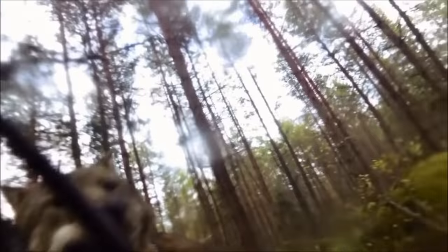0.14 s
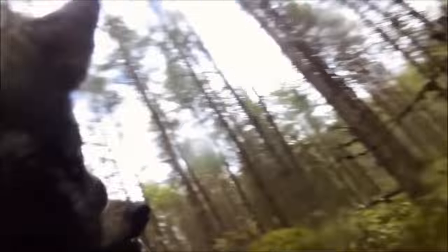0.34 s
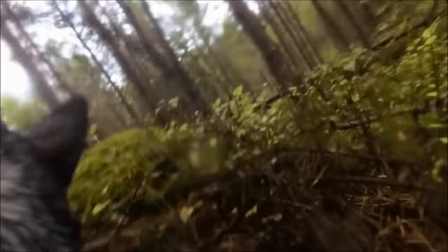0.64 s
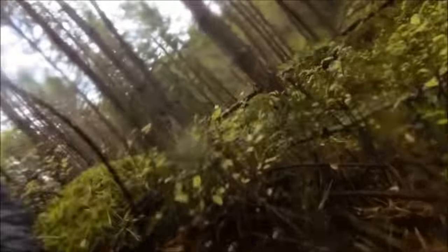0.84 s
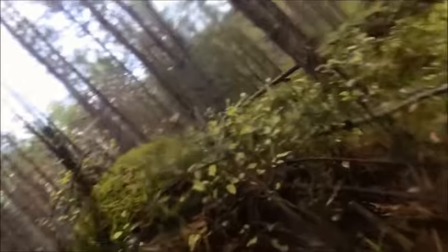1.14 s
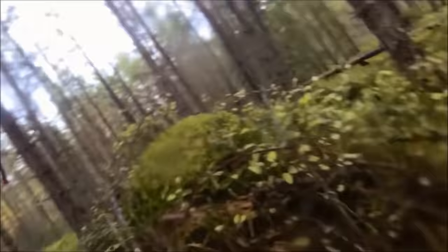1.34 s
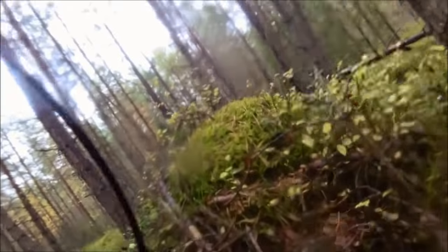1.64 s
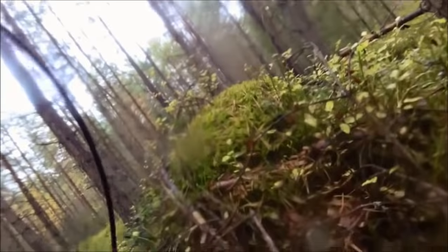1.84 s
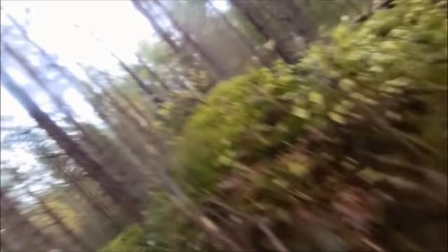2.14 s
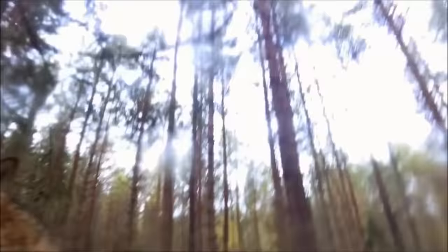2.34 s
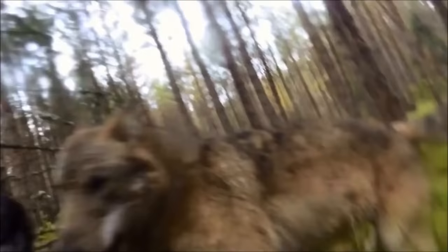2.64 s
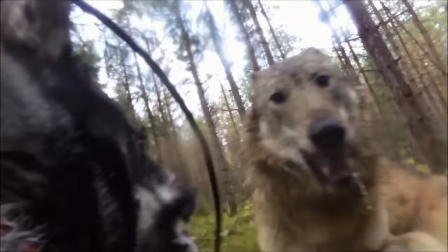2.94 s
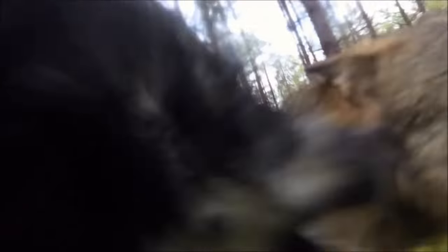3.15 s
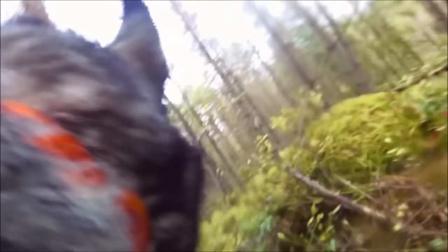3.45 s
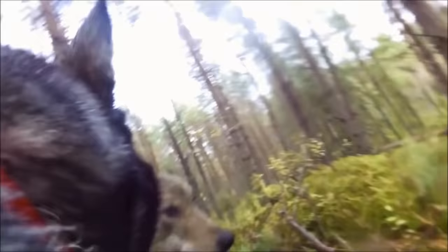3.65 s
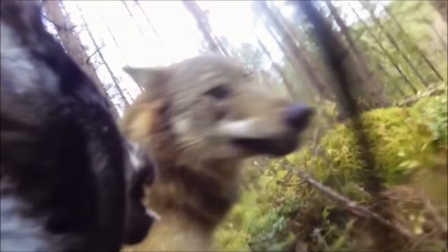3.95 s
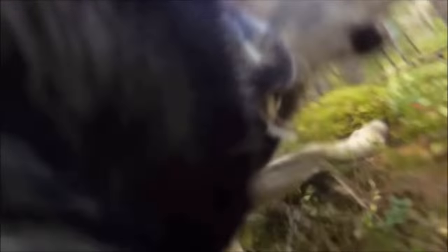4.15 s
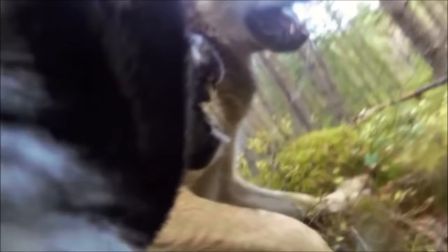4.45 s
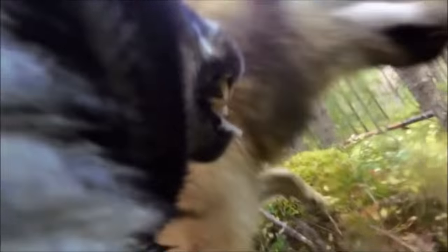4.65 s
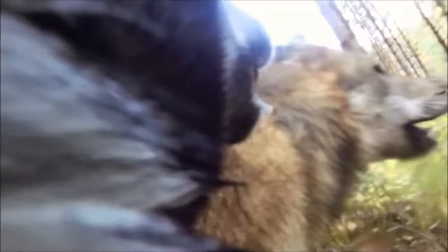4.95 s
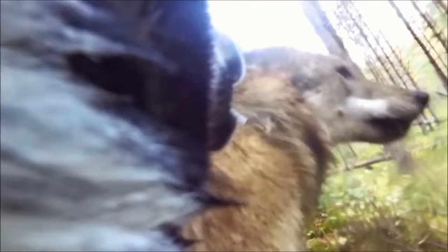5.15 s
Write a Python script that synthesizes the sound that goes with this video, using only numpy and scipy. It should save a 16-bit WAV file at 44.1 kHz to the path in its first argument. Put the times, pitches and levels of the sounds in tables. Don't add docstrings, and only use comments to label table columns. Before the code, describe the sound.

Body-worn microphone inside a plastic case: uneven hard clacks, small ticks, leaf brushes and low thuds as a dog scuffles through forest undergrowth. Knocks come in bursts, densest around 3.3 to 3.5 and 4.2 to 4.6 seconds, some distorting. A wolf's soft, throaty growl emerges near 3 seconds, falls in pitch near 3.8, and returns in the last half second among muffled fur presses. Quiet wood murmur lies behind.

```python
import sys
import numpy as np
from scipy import signal
from scipy.io import wavfile
from scipy.ndimage import uniform_filter1d

SR = 44100
rng = np.random.default_rng(int(sys.argv[2]) if len(sys.argv) > 2 else 0)


def voltage_ratio(level):
    return 10 ** (np.asarray(level, float) / 20)


def wav_record(signal):
    frames = np.transpose(np.atleast_2d(signal))
    bounded = np.clip(frames, -1, 1)
    quanta = np.round(bounded * 32767).astype(np.int16)
    wavfile.write(sys.argv[1], SR, quanta)


N = 233447

# [f/Hz, width/Hz, level/dB]
WALL_MODES = [(1440, 247, 13.5), (860, 1200, -2.5)]
PORT_MODES = [(3353, 1110, 7), (3600, 600, -20)]
LID_MODES = [(2158, 524, 0.0057)]
# [t/s, rise/ms, fall/ms, level/dB]
STRAP_CHATTER = (.6185, 33, 11, -14)

HARD_DB = -15
KNOCK_TREBLE_DB, COAT_TREBLE_DB = -25.5, -44


def ring(x, modes, order=2):
    out = 0
    for k, (hz, width_hz, db) in enumerate(modes):
        y = x
        for _ in range(order):
            y = signal.lfilter(*signal.iirpeak(hz, hz / width_hz, fs=SR), y)
        out = out + (-1) ** k * voltage_ratio(db) * y
    return out


def walk(rate_hz):
    hold = int(SR / rate_hz)
    levels = np.repeat(rng.standard_normal(N // hold + 1), hold)
    return 1.2 * uniform_filter1d(levels, hold)[:N]


def grains(spread_db):
    return rng.standard_normal(N) * voltage_ratio(spread_db * rng.exponential(size=N))


def unit(x):
    return x / np.sqrt(np.mean(x ** 2))


def curve(table):
    s, *columns = np.transpose(table)
    return [np.interp(np.arange(N) / SR, s, c) for c in columns]


def seal(x):
    return signal.sosfilt(signal.butter(6, 4500., fs=SR, output="sos"), x)


def add(out, s, rise_ms, fall_ms, db, source, body=None, order=2):
    start = max(int((s - 0.0028 * rise_ms) * SR), 0)
    stop = min(int((s + .0025 * fall_ms + .01) * SR), N)
    ms = (np.arange(start, stop) / SR - s) * 1000
    swell = voltage_ratio(-9 * np.where(ms <= 0, (ms / rise_ms) ** 2, (ms / fall_ms) ** order))
    y = swell * source[start:stop]
    if body is not None:
        y = ring(y, body)
    out[start:stop] += voltage_ratio(db) * y * np.sqrt(np.sum(swell ** 2) / np.sum(y ** 2))


def contacts():
    # [t/s, fall/ms, level/dB, wall share/dB, lid share/dB]
    knocks = [(0.4169, 4.2, -6.5, -9.5, -13.5), (0.4253, 13, -9, -4.5, -4), (0.5269, 4.9, -8, -10, -12),
              (.533, 6.5, -20, -7, -5), (0.5398, 6.5, -8.5, -12, -10), (0.767, 1.6, -8.5, -21, -28),
              (0.792, 2.7, -13.5, -3.5, -25), (2.9009, 7.2, -8, -8.5, -9), (3.254, 35, -24.5, -20, -25),
              (3.255, 6, -6.5, -6.5, -7), (3.267, 7.3, -8, -2, -25), (3.3596, 27.2, -7.5, -3.5, -10),
              (3.4174, 5, -8.5, -5.5, -13.5), (3.4932, 4.7, -9, -3.5, -1), (3.4985, 26, -14.5, -10.5, -9.5),
              (3.5016, 4.5, -6.5, -1, -16.5), (3.9713, 6.6, -7, -6, -4), (4.2227, 20, -21, -4.5, -2),
              (4.227, 4.3, -7, -5.5, -14.5), (4.2389, 3.2, -6, -.4, -18.5), (4.2808, 4.5, -7, -5.5, -7),
              (4.2932, 8.6, -9, -3.5, -5), (4.3145, 2.8, -14, -15, -21), (4.317, 26, -12, -4, -14),
              (4.3475, 3.4, -11, -4.5, -19), (4.3725, 3.9, -18.5, -5.5, -7.5), (4.3762, 1.7, -15, -10, -9),
              (4.473, 9.9, -9, -10, -20.5), (4.4917, 3.9, -13, -6, -11), (4.5458, 3, -7, -7, -9),
              (4.564, 3.4, -10, -10, -14), (4.5726, 2, -7.5, -3.5, -5.5)]
    # [t/s, level/dB, wall share/dB]
    ticks = [(0.1047, -23.5, -8), (0.51, -27, -9), (0.651, -36, -18), (0.6616, -30, -11), (0.762, -16, -26),
             (0.8463, -15.5, -11.5), (0.89, -36, -9), (0.9872, -18, -29), (1.2045, -12.5, -5.5),
             (1.2155, -19, -2), (1.476, -18.5, -11.5), (1.5643, -20, -4.5), (1.6206, -25, -10),
             (1.629, -17.5, -5), (1.7728, -27, -3), (2.352, -16, -6), (2.4729, -20, -6), (2.5401, -19, -36),
             (2.5834, -32, -9.3), (4.803, -31, -1), (2.705, -17, -7), (3.291, -19, -4),
             (3.5225, -11.5, -28), (3.5347, -11, -25), (3.545, -13, -4), (3.5704, -13.5, -37),
             (3.7175, -24.5, -22), (4.1411, -27.5, -4), (4.3045, -21.5, -1.5), (5.213, -25, -25),
             (0.4439, -16, -4), (1.559, -25.5, -3), (1.682, -32, -2), (1.716, -38.5, -20), (.402, -26, -25),
             (0.697, -30, -30), (.855, -17.5, -14), (2.617, -35, 0), (2.646, -22.5, -10), (2.657, -32, -14),
             (2.661, -35, -12), (2.674, -40, -7), (2.7, -24, -19), (2.714, -31, -3), (2.74, -19, -18),
             (2.745, -18.5, -12), (2.75, -17, -11), (2.791, -32, -16), (2.879, -33, -20), (2.884, -36, -14),
             (2.895, -37, -25), (4.984, -29, -11), (4.422, -56, -4), (3.4492, -10.5, -8), (.168, -42.5, -9),
             (.331, -39, -5), (0.347, -40, 1.5), (2.486, -23.5, -15), (3.323, -35, -16), (3.655, -42, -15)]
    # [t/s, fall/ms, level/dB]
    swipes = [
        (.762, 56, -29.5),
        (1.716, 6, -45),
        (1.8001, 39, -44.5),
        (1.8593, 17, -28.5),
        (2.238, 13, -34),
        (2.396, 18, -16),
        (3.308, 16, -33),
        (3.77, 100, -49.5),
        (3.9907, 89, -53),
        (4.259, 54, -38.5),
    ]
    # [t/s, rise/ms, level/dB]
    pulls = [(0.039, 40, -42.5), (0.3676, 20, -36), (0.462, 63, -30.5), (0.856, 46, -31.5),
             (.9309, 37, -47), (1.6687, 5.8, -21.5), (2.4642, 18, -14), (2.7499, 13, -32),
             (2.8034, 40, -43.5), (3.4057, 41, -21), (3.44, 16, -18.5), (3.4707, 61, -32.5),
             (3.875, 25, -38), (4.1551, 18, -41), (4.197, 24, -41.5)]
    # [t/s, rise and fall/ms, level/dB]
    rubs = [(0.114, 16, -42.5), (0.704, 40, -29.5), (0.987, 18, -43), (1.2036, 51, -48), (1.482, 27, -41.5),
            (1.6025, 84, -45.5), (2.328, 31, -28), (2.423, 49, -25.5), (2.545, 13, -37), (2.7036, 18, -34),
            (2.889, 38, -52), (3.58, 46, -37.5), (4.338, 16, -16), (.49, 30, -45.5), (2.63, 30, -44.5),
            (2.84, 17, -43), (.262, 17, -50), (.69, 6.1, -28), (1.455, 11, -41)]
    # [t/s, peak/dB, treble/dB]
    crackles = [(1.4458, -24, -63), (1.499, -20, -49), (1.514, -26, -46), (1.5775, -30, -40),
                (1.6604, -7.5, -52), (1.708, -36, -40), (1.758, -37, -60), (1.8006, -20, -52),
                (1.8156, -22, -60), (2.027, -46.5, -48), (2.238, -14, -48), (3.346, -25, -55),
                (3.6168, -25, -66), (3.64, -36, -62), (3.94, -46, -68), (4.064, -38, -73),
                (4.3947, -34, -69), (4.436, -32, -64)]
    # [t/s, rise/ms, fall/ms, level/dB]
    presses = [(4.502, 1.9, 21.5, -25.5), (4.5865, 33, 33, -31.5), (4.68, 15, 18, -24.5),
               (4.712, 22, 17.5, -14), (4.738, 14, 12.2, -18.5), (4.8126, 13, 30, -29),
               (4.895, 20, 8.4, -50), (4.9358, 18, 12, -26), (4.975, 25, 4.4, -28.5),
               (4.9973, 1.2, 42.5, -26.5), (5.055, 15, 6.8, -34.5), (5.11, 40, 40, -50.5),
               (5.1936, 22, 10, -28), (5.2706, 13, 16, -40.5)]
    blow_ms = 1.3
    scrape = (-9.5, -30)
    touches = [(s, blow_ms, fall, db, wall, KNOCK_TREBLE_DB, lid) for s, fall, db, wall, lid in knocks]
    touches += [(s, blow_ms, 2.08, db, wall, -31) for s, db, wall in ticks]
    touches += [(s, blow_ms, fall, db, *scrape) for s, fall, db in swipes]
    touches += [(s, rise, 0.26 * rise, db, *scrape) for s, rise, db in pulls]
    touches += [(s, ms, ms, db, *scrape) for s, ms, db in rubs]
    touches += [(s, blow_ms, 1.67, db - 3.5, -4, top - db + 3.5 - 9.5) for s, db, top in crackles]
    touches += [(*press, -8, COAT_TREBLE_DB) for press in presses]
    touches += [(*STRAP_CHATTER, *scrape)]
    return touches


def case():
    # [f/Hz, width/Hz, level/dB]
    treble_modes = [(5120, 1900, 13), (8410, 3000, -17), (13000, 9000, -0.5)]
    low, high = np.zeros(N), np.zeros(N)
    t = np.arange(N) / SR
    jerks = unit(grains(spread_db=2.0) * voltage_ratio(4.07 * walk(300)))
    rattle = unit(grains(spread_db=0.5) * voltage_ratio(0.51 * walk(300)))
    for s, rise, fall, db, wall_db, treble_db, *own_lid in contacts():
        lid_db = own_lid[0] if own_lid else -8.5
        hard = db > HARD_DB
        dull = treble_db == COAT_TREBLE_DB
        knock = treble_db == KNOCK_TREBLE_DB
        push = np.roll(rattle if hard or dull else jerks, int(s * 9973))
        if s == STRAP_CHATTER[0]:
            push *= voltage_ratio(4 * np.cos(2 * np.pi * 165 * (t - .6035)))
        order = 4 if knock else 2
        if rise < 2.4:
            s, rise = s - .0007, .3 * rise
            push[int(s * SR)] = 5.9
        port_db = 10 * np.log10(max(1 - voltage_ratio(2 * wall_db) - voltage_ratio(2 * lid_db), .1))
        low_db = db + .45 * max(db + 12, 0)
        wall = WALL_MODES[:1] if dull else WALL_MODES
        add(low, s, rise, fall, low_db + wall_db - .4, push, wall, order)
        add(low, s, rise, fall, low_db + port_db + 0.56, push, PORT_MODES, order)
        add(low, s, rise, fall, low_db + lid_db, push, LID_MODES, order)
        add(high, s, rise, 1.1 * fall, db + treble_db + 3.5, push, treble_modes[:2], order)
        if hard and knock:
            add(high, s, rise, min(fall, 5), db + treble_db - 1, push, treble_modes[2:])
    return seal(low) + high


def mount():
    # [t/s, fall/ms, level/dB, centre f/Hz]
    jolts = [(0.5295, 23, -19.5, 215), (0.6896, 14, -17.5, 385), (.8583, 10.6, -21.5, 148),
             (1.2034, 8.9, -19, 395), (1.7323, 100, -39.5, 238), (1.806, 19.6, -24, 195),
             (2.2387, 58, -28.5, 230), (2.4245, 2, -0.5, 183), (2.5068, 21, -29, 270),
             (2.5412, 4, -11.5, 424), (2.907, 4.9, -14.5, 265), (3.2564, 9.9, -14, 220),
             (3.794, 42, -32.5, 262), (3.974, 11.3, -17, 333), (3.9844, 11.7, -24, 183),
             (4.154, 6.5, -29.5, 530), (4.2329, 14.2, -19.5, 355), (4.283, 6.7, -14.5, 490),
             (4.342, 6.1, -25.5, 580), (4.3725, 2.7, -18, 473), (4.3944, 45, -39.5, 230),
             (4.474, 8.9, -20, 422), (4.5459, 6.3, -18, 300), (4.5727, 4.5, -15.5, 446),
             (2.267, 3.4, -29.5, 395), (2.787, 13, -37, 580), (4.813, 25, -33.5, 700),
             (4.979, 8.2, -25.5, 600), (.794, 4, -25.5, 410), (2.317, 7.7, -20, 600), (2.394, 8, -18, 650),
             (2.462, 8.2, -20.5, 695), (1.629, 8, -25.5, 510), (1.76, 5, -25.5, 400),
             (1.499, 4, -18.5, 221)]
    # [t/s, rise/ms, fall/ms, level/dB, centre f/Hz]
    heaves = [(.0254, 160, 9.8, -38.5, 205), (0.101, 9, 28, -35, 250), (0.428, 7.8, 15.5, -15, 164.5),
              (0.4339, 57, 11, -25.5, 167), (.79, 57, 32, -22.5, 244), (0.9934, 16.3, 2.8, -24.5, 179.5),
              (1.1988, 59, 58, -37.5, 181), (1.332, 41, 17, -46.5, 176), (1.491, 41.7, 17, -21, 195),
              (1.6161, 11, 35, -28, 232), (1.667, 9.4, 9.1, -10, 183), (1.862, 7, 12.7, -16, 252),
              (1.9103, 32, 16, -37.5, 233), (2.1477, 37, 30, -40, 222), (2.3229, 11, 2.8, -12.5, 148),
              (2.4204, 35, 51, -19, 244), (2.724, 42, 35, -25.5, 152), (3.3991, 50, 49, -20, 246),
              (3.4946, 7.1, 48, -23.5, 283), (4.5827, 12, 22, -31.5, 367), (4.729, 48, 16.3, -23, 506),
              (4.9503, 29, 24, -28, 356), (5.0146, 11, 38, -26.5, 273), (5.2, 27, 5.8, -29.5, 416)]
    # [t/s, rise/ms, fall/ms, level/dB, f/Hz]
    hums = [
        (.88, 15, 12.4, -23, 271),
        (1.012, 35, 26, -33, 80),
        (1.734, 5.5, 14, -25.5, 282),
        (3.287, 13, 20, -28, 69),
        (3.419, 12, 17, -24.5, 286),
        (3.505, 9.3, 10.3, -16, 280),
        (4.523, 11, 5.6, -32, 394),
        (4.578, 3, 12, -18.5, 400),
    ]
    out, shake = np.zeros(N), unit(grains(spread_db=3.0))
    sharp = [(s, 0.53 / hz * 1000, fall, db, hz) for s, fall, db, hz in jolts]
    for k, (s, rise, fall, db, hz) in enumerate(sharp + heaves):
        first = max(int(s * SR) - 9000, 0)
        push = shake[first:first + 18000][::(-1) ** k].copy()
        if k < len(sharp):
            push[int((s - .6 / hz) * SR) - first] = 33.0 * (-1) ** k
        heavy_db = -11 * np.log2(hz / 150)
        modes = [(1.06 * hz, 1.61 * hz, 0), (85, 130, heavy_db), (700, 1200, -19)]
        swing = np.zeros(N)
        swing[first:first + len(push)] = ring(push, modes)
        add(out, s, rise, fall, db + 0.41, swing)
    for s, rise, fall, db, hz in hums:
        tone = np.sqrt(2) * np.sin(2 * np.pi * hz * (np.arange(N) / SR - s))
        add(out, s, rise, fall, db, tone)
    return signal.lfilter(*signal.butter(2, 1800., fs=SR), out)


def buckle():
    # [t/s, level/dB, tongue swing/dB]
    strikes = [
        (2.903, -34, -6),
        (3.268, -22, -24),
        (3.973, -27.5, 0),
        (4.24, -28.5, -16),
    ]
    # [f/Hz, level/dB, t60/s]
    metal_modes = [(2575, 0, .17), (3066, 0, .13), (3500, -8, .06), (5410, -22, .065), (6590, -28, .05)]
    out, t = np.zeros(N), np.arange(N) / SR
    for s, db, tongue_db in strikes:
        age = np.maximum(t - s, 0)
        for k, (hz, mode_db, t60_s) in enumerate(metal_modes):
            if k == 0:
                mode_db = mode_db + tongue_db
            out += voltage_ratio(db + mode_db - 60 * age / t60_s) * np.sin(2 * np.pi * hz * age)
    return out


def wolf():
    # [t/s, pitch/Hz, first partial/dB, second partial/dB]
    growl_a = [(2.8, 124, -51, -29), (2.845, 128.8, -49, -38.5), (2.876, 135.7, -47, -34),
               (2.94, 128.9, -51, -32), (2.975, 127, -39.5, -34.5), (3.018, 118.8, -38.5, -37),
               (3.1, 128.8, -34.5, -37), (3.169, 120.7, -37, -41), (3.25, 110, -41, -39)]
    growl_b = [(3.64, 151, -45, -55), (3.72, 142, -33, -48), (3.76, 134, -33, -39), (3.85, 105.8, -34, -48),
               (3.945, 92.7, -35, -60), (4.005, 79.3, -33, -61), (4.03, 74.6, -48, -70)]
    growl_c = [(4.78, 122.1, -36, -36), (4.822, 128.8, -44, -34), (4.854, 137.3, -34, -33),
               (5.072, 155.2, -37.5, -39.5), (5.138, 147.8, -36, -32), (5.168, 150.7, -41, -52),
               (5.178, 146.6, -34, -32.5), (5.254, 140.5, -35, -34), (5.29, 132.3, -39, -29)]
    # [pitch wobble share, level flutter/dB]
    roughness = [
        (.008, 1.3),
        (.016, 1.8),
        (.014, 1.8),
    ]
    out, t = 0, np.arange(N) / SR
    for growl, (wobble, flutter_db) in zip((growl_a, growl_b, growl_c), roughness):
        hz, first_db, second_db = curve(growl)
        since_start, to_end = t - growl[0][0], growl[-1][0] + .015 - t
        gate = np.clip(np.minimum(since_start, to_end) / .015, 0, 1)
        phase = 2 * np.pi * np.cumsum(hz * (1 + wobble * walk(70))) / SR
        upper = np.sin(2 * phase + 2.0) + voltage_ratio(-31.5) * np.sin(3 * phase)
        voice = voltage_ratio(first_db + flutter_db * walk(54)) * np.sin(phase)
        voice += voltage_ratio(second_db + flutter_db * walk(60)) * upper
        out = out + np.sqrt(2) * gate * voice
    return out


def stir():
    # [t/s, motion/dB, extra deepest sway/dB]
    motion = [(0, -55.5, 4.5), (.24, -58, 0.5), (.47, -37.5, 1), (.83, -32, -1.5), (1.14, -69, 3),
              (1.49, -39, 3), (1.65, -35.5, -5), (1.85, -47, -8.5), (2.15, -58, 3.5), (2.36, -34, 1.5),
              (2.64, -44.5, 2), (2.98, -56, 6.5), (3.2, -53.5, -1), (3.42, -33, -9), (3.97, -53.5, -4),
              (4.47, -48, -2.5), (4.9, -41.5, -11), (5.27, -43, -17)]
    rumble_db, sway_db = curve(motion)
    rustle_db = -55 + 0.89 * (rumble_db + 44.5)
    fur = grains(spread_db=3.5) * voltage_ratio(6.8 * walk(90))
    rustle = unit(seal(ring(fur, PORT_MODES + LID_MODES) + voltage_ratio(-4.5) * ring(fur, WALL_MODES)))
    body = grains(spread_db=2.0) * voltage_ratio(5.5 * np.tanh(walk(25)))
    sway = unit(ring(body, [(27.8, 37, 1.0), (73.4, 77, 7.1)], order=3))
    rumble = unit(ring(body, [(176.0, 240, 0.5), (290.0, 295, 4.5), (755, 490, -15.5)], order=3))
    air = rng.standard_normal(N)
    hiss = unit(ring(air, [(3340, 3700, -2.5), (895, 1500, 5.0), (9800, 4000, -17.0)]))
    moving = voltage_ratio(rumble_db + 4.0) * (rumble + voltage_ratio(sway_db) * sway)
    return voltage_ratio(rustle_db) * rustle + moving + voltage_ratio(-61.5 + 2.5 * walk(12)) * hiss


def scene():
    return (case() + mount() + buckle() + wolf() + stir())[None]


def top_cut(x):
    return signal.sosfilt(signal.butter(12, 16530, fs=SR, output="sos"), x)


def record(dry):
    top = .8
    flat = top * dry / (top ** 4 + dry ** 4) ** (1 / 4)
    return top_cut(signal.lfilter(*signal.butter(2, 7500., fs=SR), flat))


dry = scene()
out = record(dry)
wav_record(out)
```